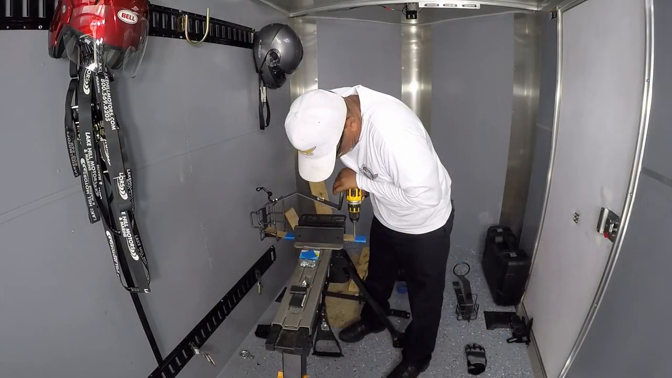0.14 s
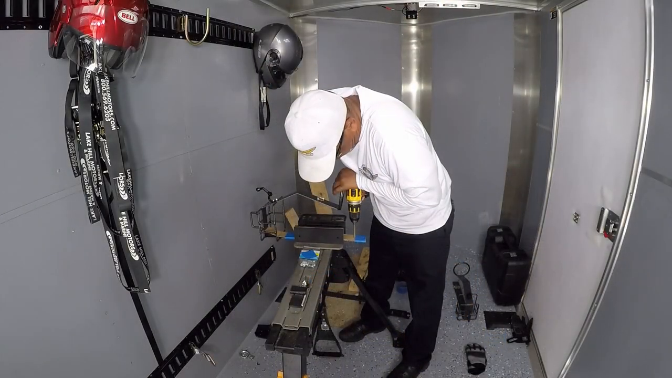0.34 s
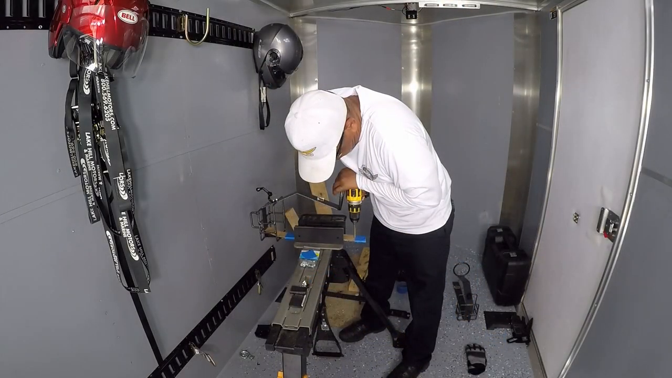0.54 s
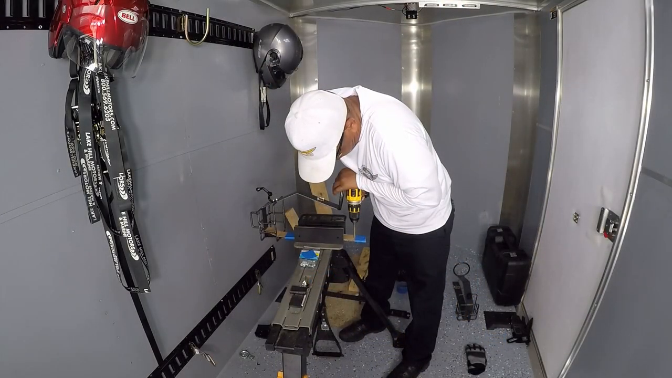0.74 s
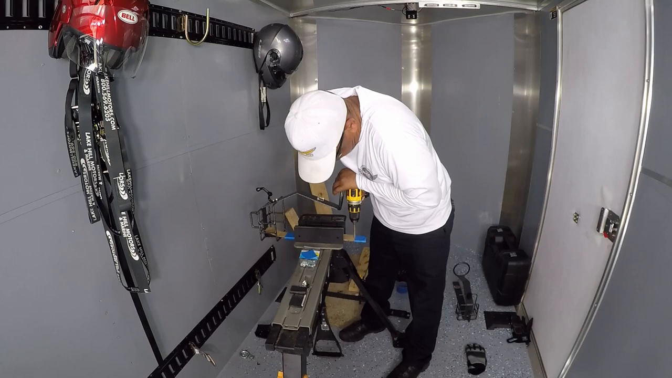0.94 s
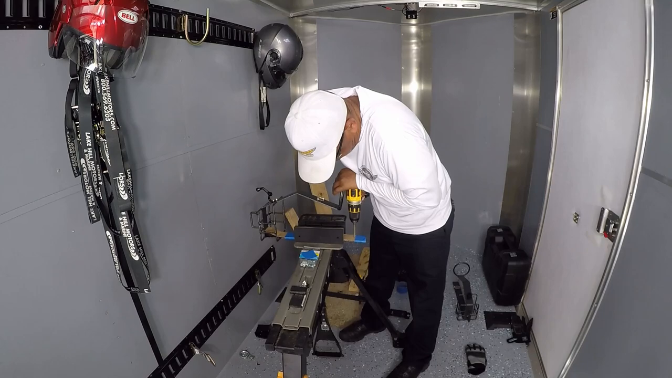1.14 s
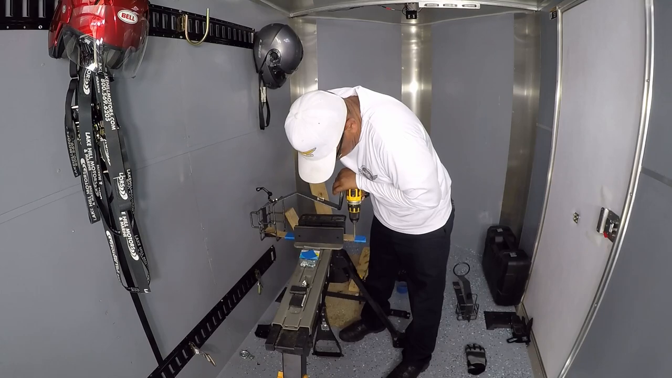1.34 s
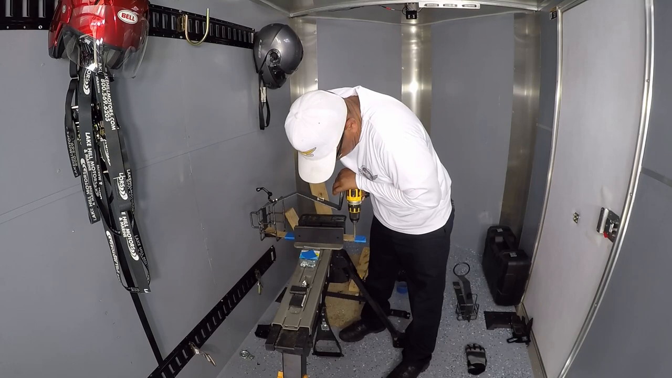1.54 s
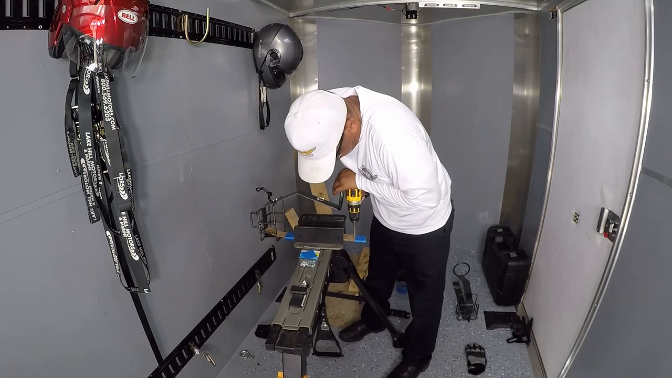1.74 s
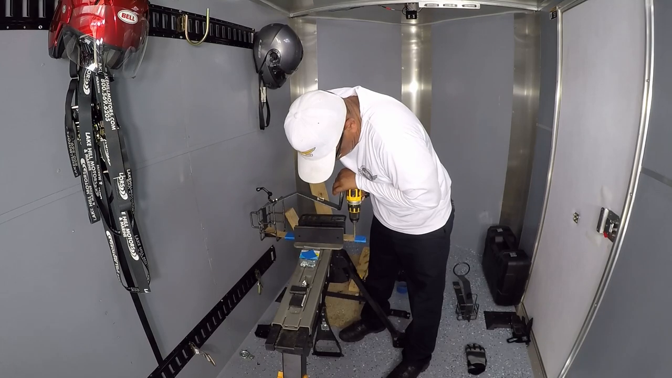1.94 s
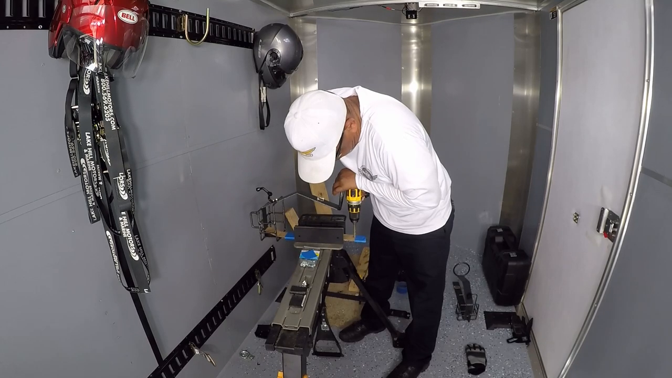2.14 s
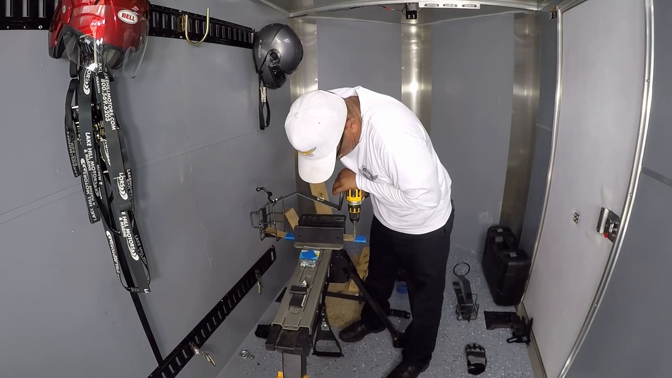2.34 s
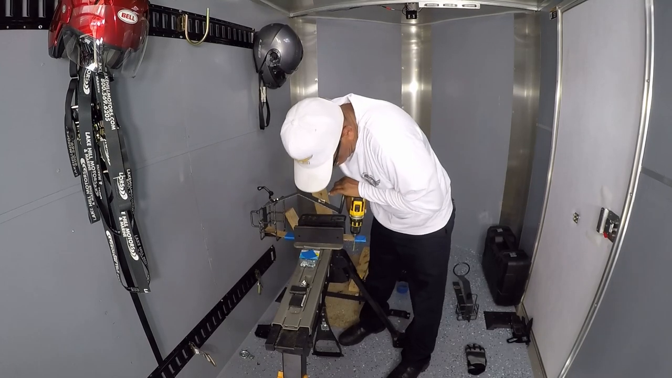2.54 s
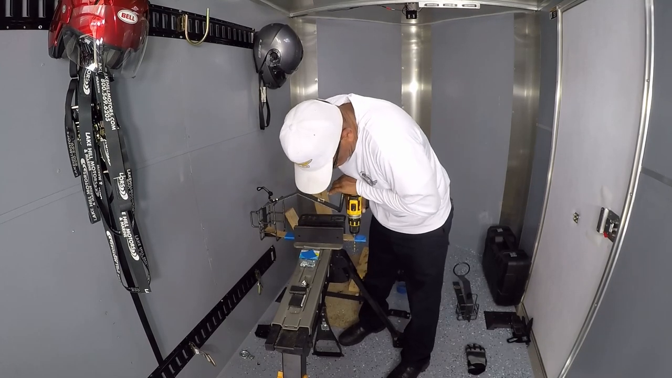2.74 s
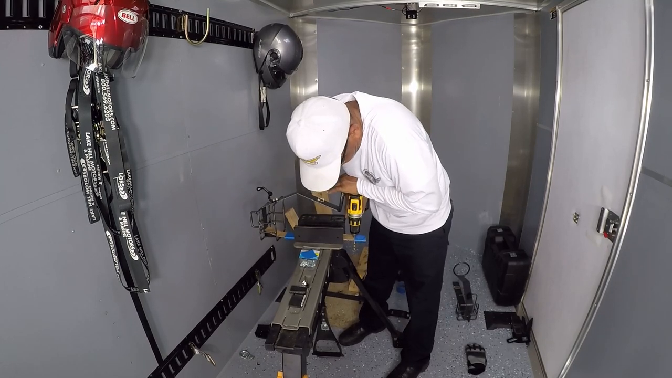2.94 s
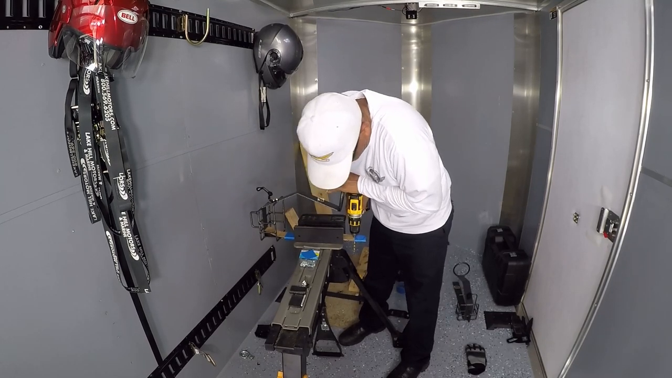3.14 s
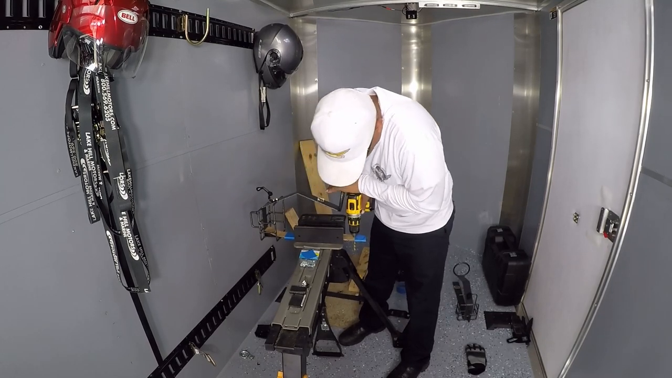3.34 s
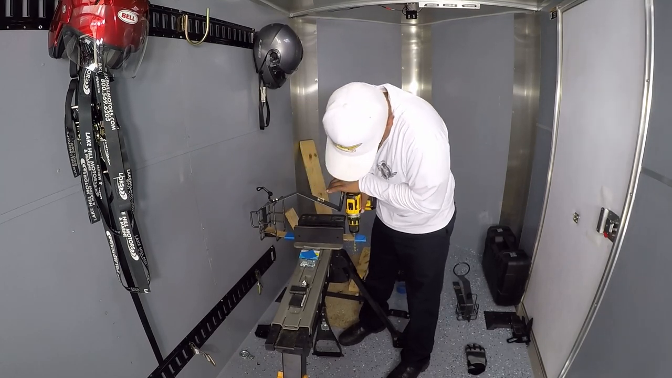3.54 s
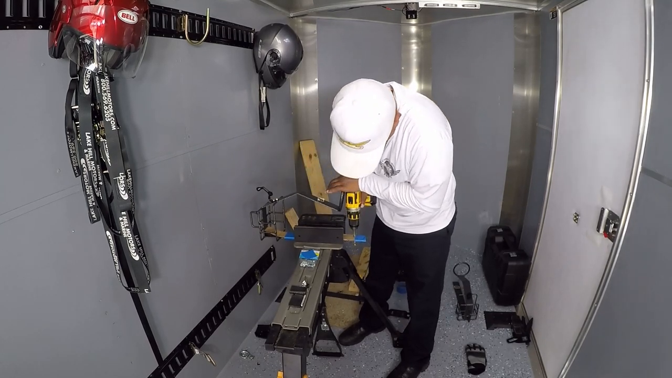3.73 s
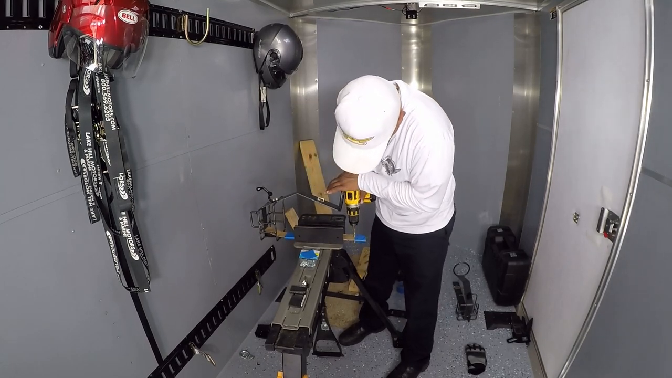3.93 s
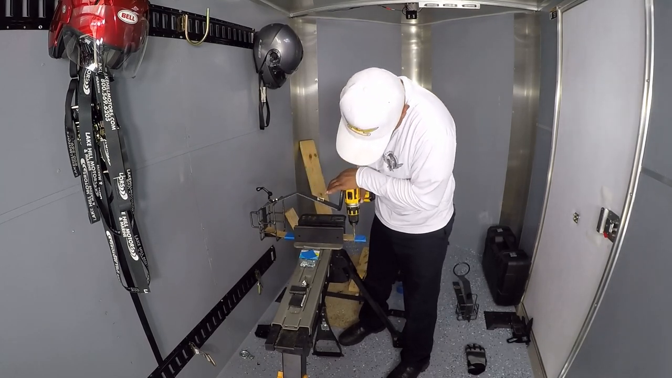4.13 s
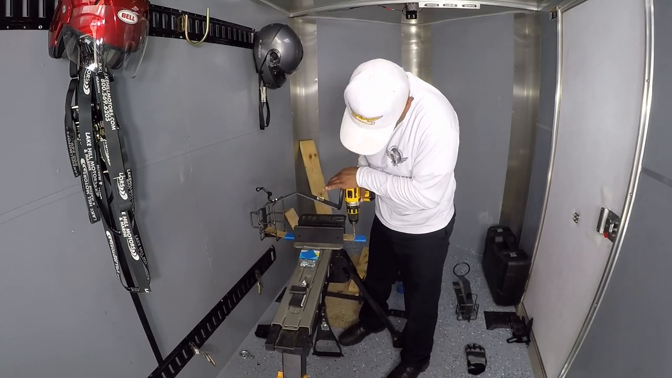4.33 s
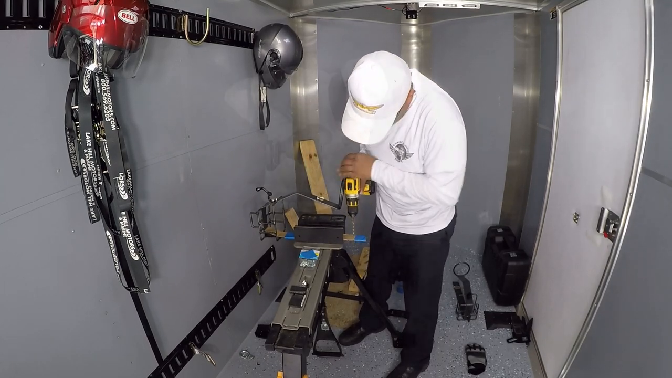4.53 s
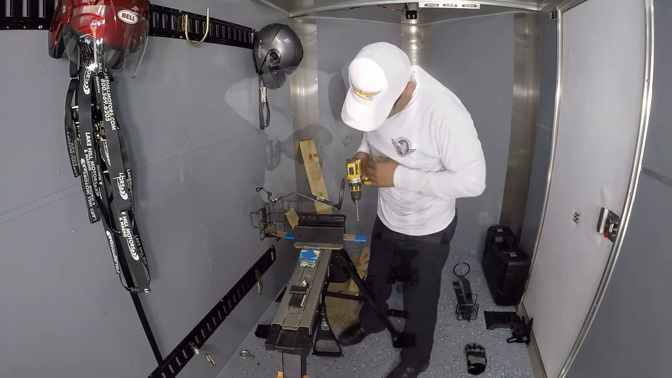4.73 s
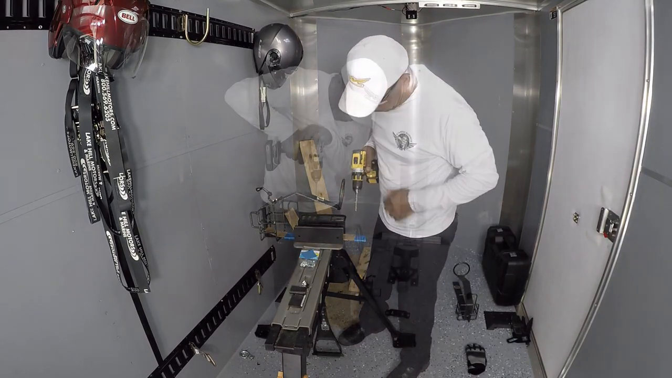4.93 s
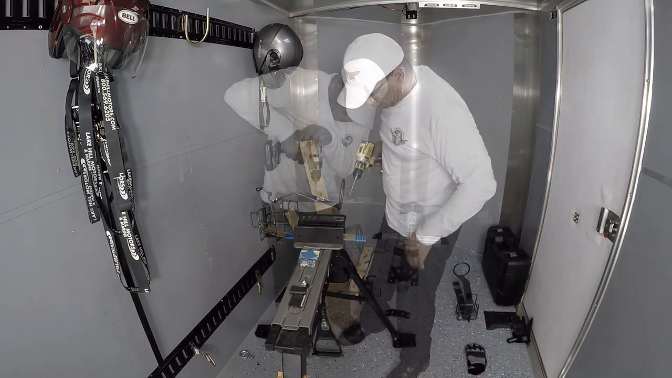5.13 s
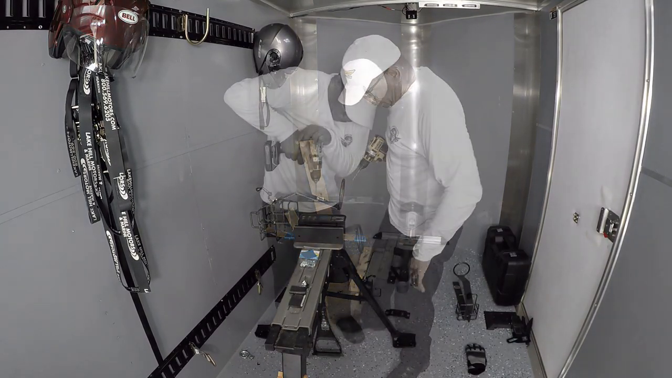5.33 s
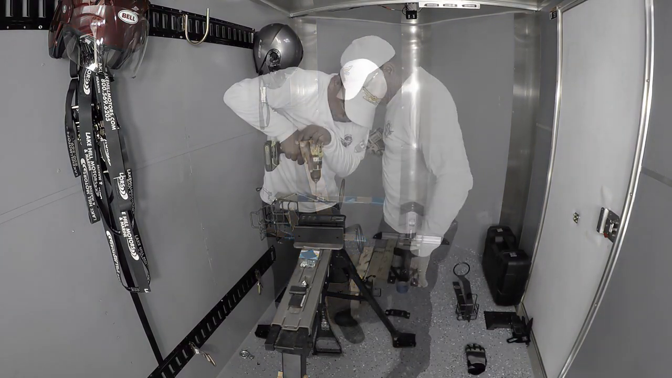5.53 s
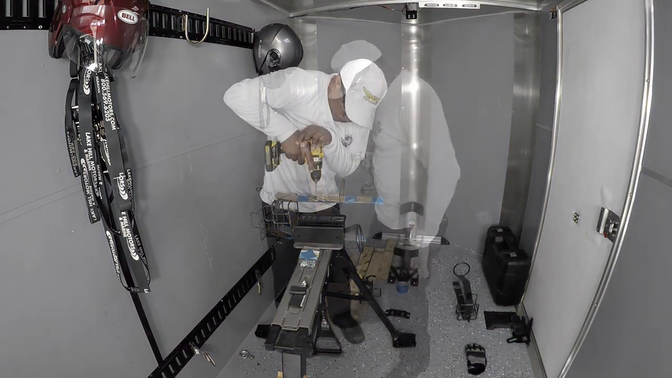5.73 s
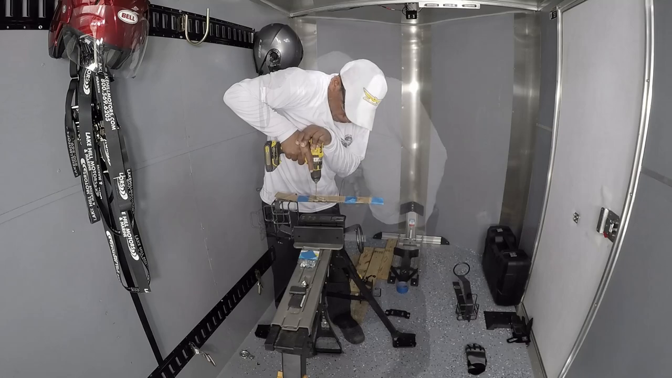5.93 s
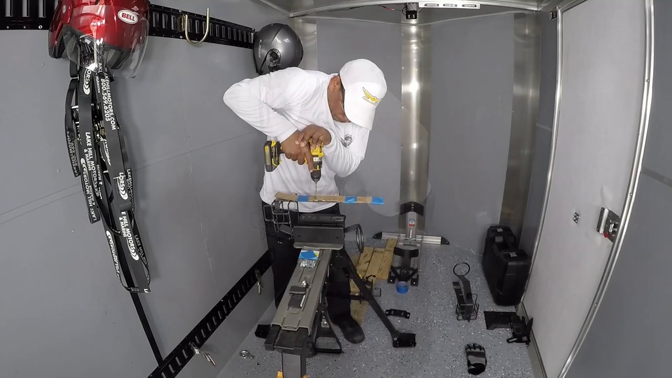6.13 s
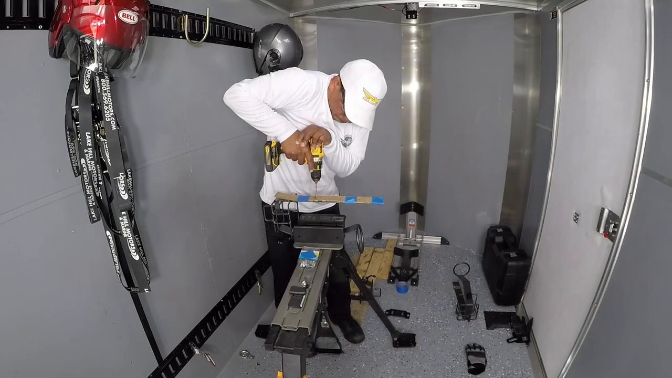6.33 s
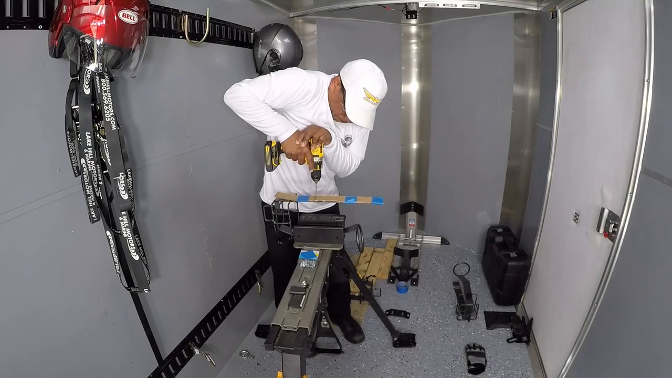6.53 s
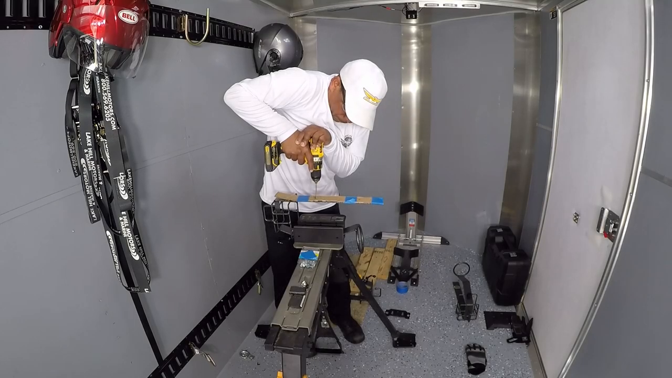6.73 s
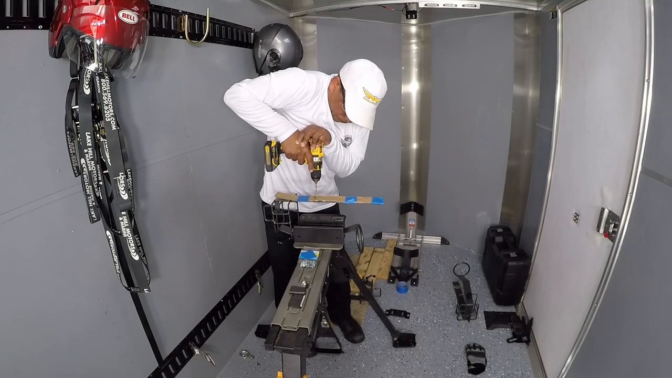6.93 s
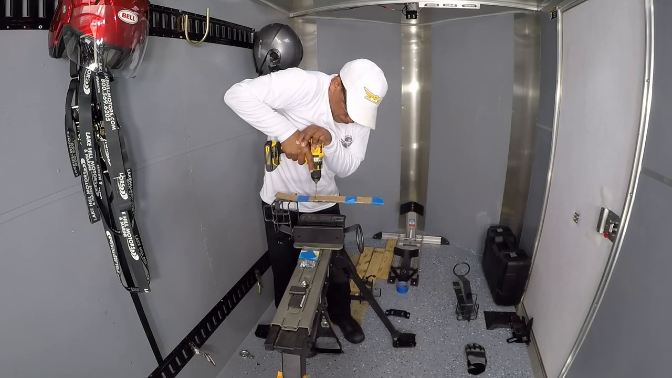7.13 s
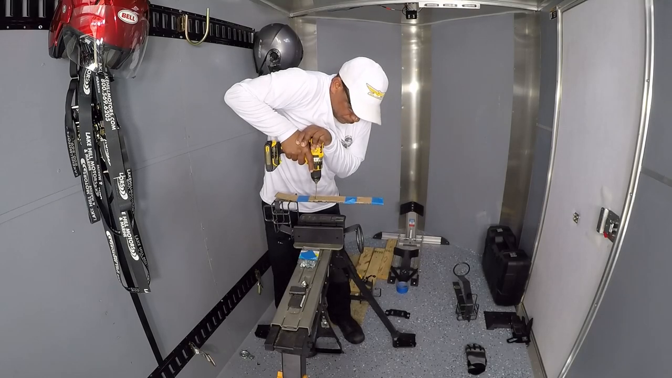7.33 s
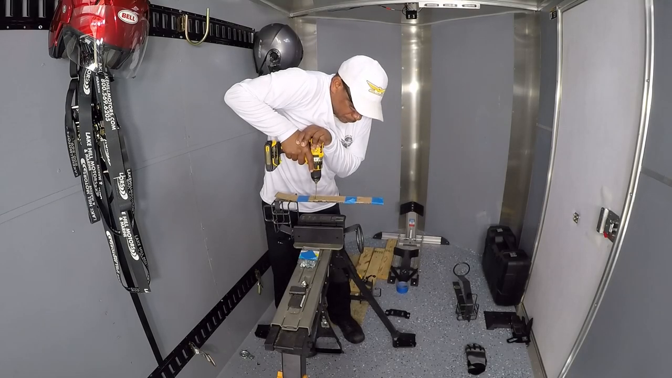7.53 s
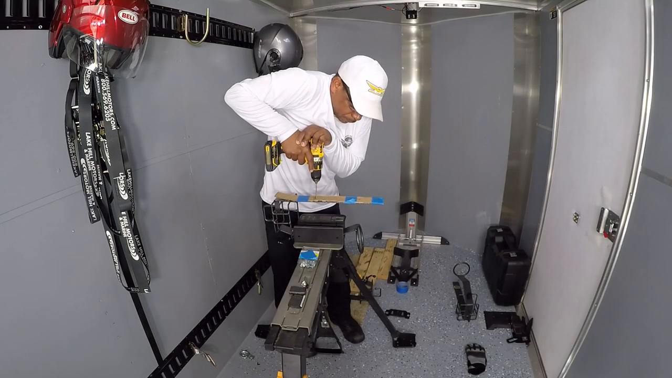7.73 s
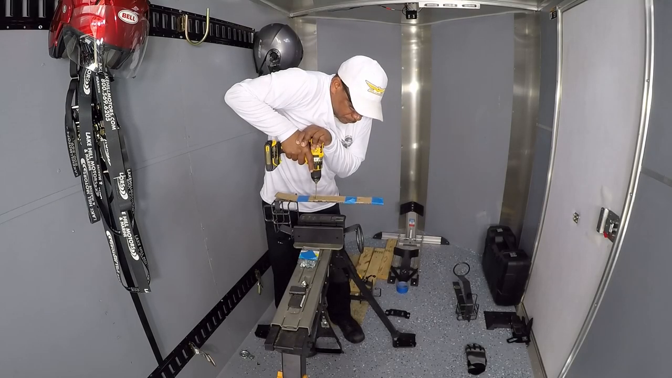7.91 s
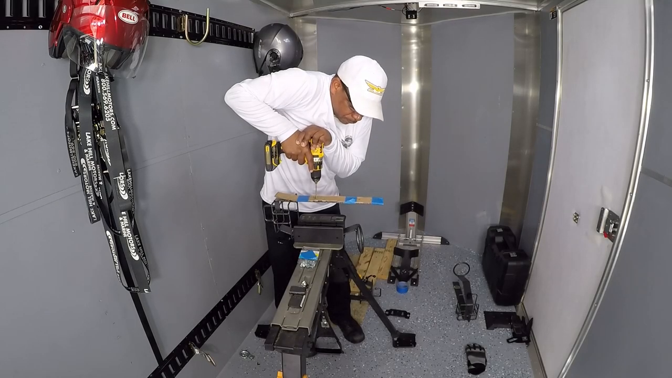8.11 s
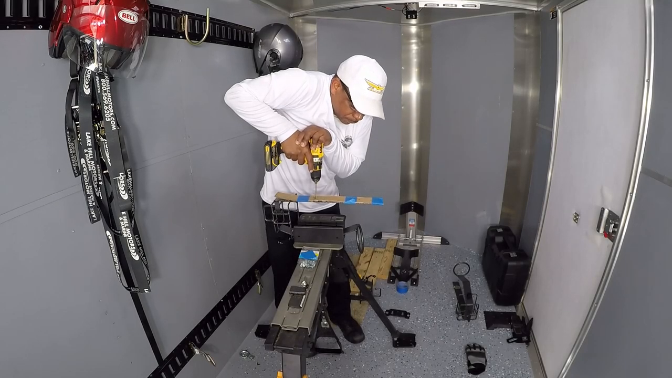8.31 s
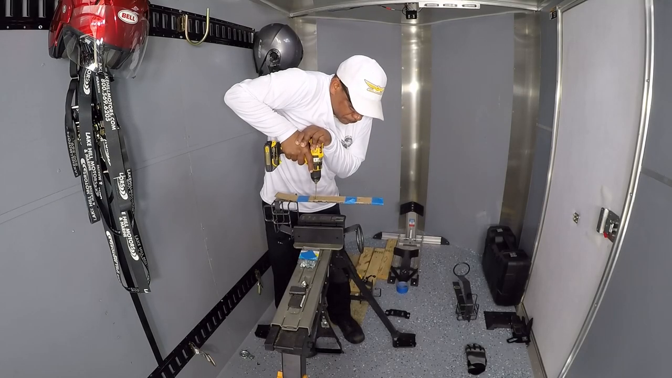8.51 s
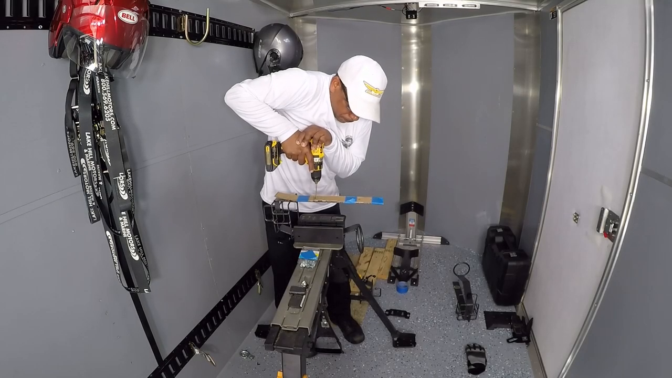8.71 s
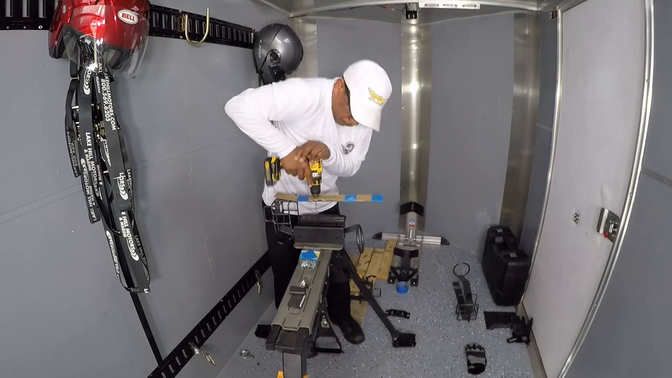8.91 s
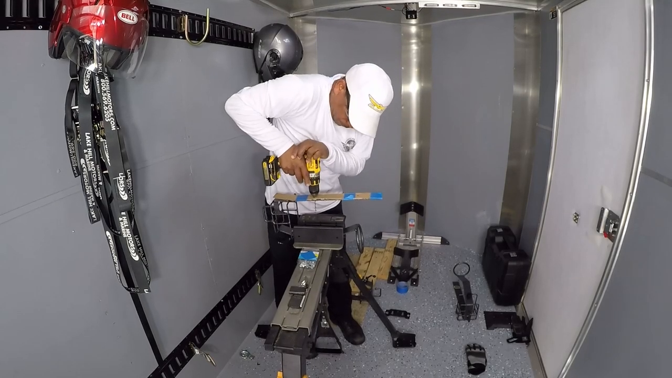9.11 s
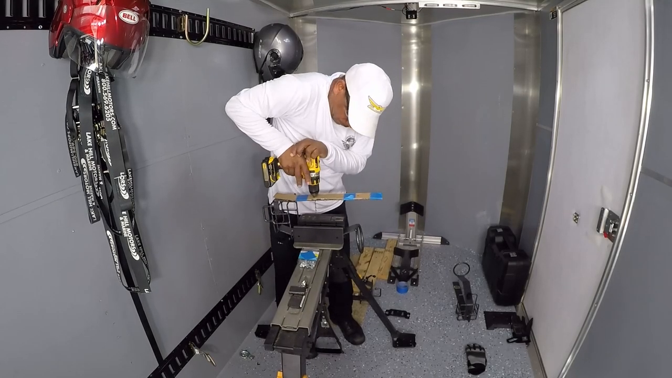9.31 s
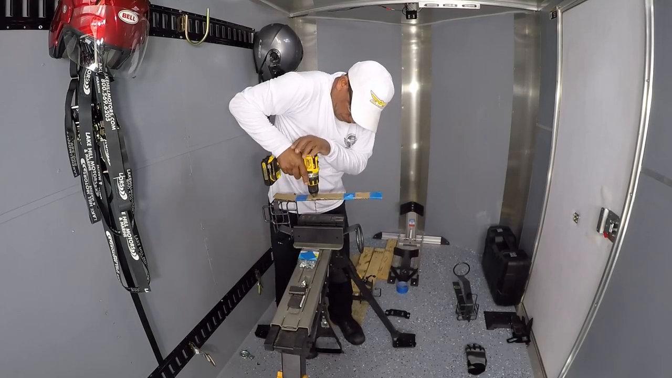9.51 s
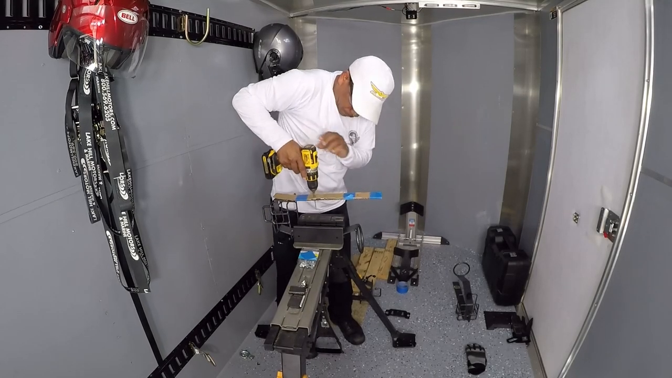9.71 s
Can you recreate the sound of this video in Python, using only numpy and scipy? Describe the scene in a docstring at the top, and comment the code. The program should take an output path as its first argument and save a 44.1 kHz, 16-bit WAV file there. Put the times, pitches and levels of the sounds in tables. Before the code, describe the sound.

One microphone in a bare, boxy trailer picks up a drill biting steel held in a vice: gritty chatter pulsing with each turn while the stand rumbles. The bit catches with a clatter and hard knock. After small clicks and a smooth motor whir, the next cut creeps in, squawking and squealing unevenly until it too snags with a heavy thump. Quiet air, clicks and a short whir finish.

```python
"""Inside an empty-sounding box trailer, one microphone channel: a cordless drill on a steel bracket in a vice.
It opens in the first hole, chattering with every turn, then snags, rattles and knocks as it breaks through.
The drill whirs freely, then bores a second hole with squawks and squeals, snags again and whirs briefly.
Cutting is random chip grains and resonances, the motor noise and tones, the shaking stand low sines and
noise. Each source has its own share of wall reflections, hence its apparent distance; faint air throughout."""
import sys
import numpy as np
from scipy import signal
from scipy.fft import rfft, irfft, next_fast_len
from scipy.io import wavfile
from scipy.ndimage import uniform_filter1d

SR = 44100
rng = np.random.default_rng(int(sys.argv[2]) if len(sys.argv) > 2 else 0)


def generate_wav(signal):
    """Clip the signal to [-1, 1] and save it as 16-bit WAV at the path in sys.argv[1]."""
    frames = np.transpose(np.atleast_2d(signal))
    scaled = np.clip(frames, -1, 1) * 32767
    pcm = np.round(scaled).astype(np.int16)
    wavfile.write(sys.argv[1], SR, pcm)


N = 430416
TIME = np.arange(N) / SR
# In all tables level/dB is relative, before the trims and wavering in the function that plays it.


def from_db(db):
    """Decibels to gain."""
    return 10 ** (np.asarray(db) / 20)


def rms_one(x):
    """Scale to unit power."""
    return x / np.sqrt(np.mean(x ** 2) + 1e-20)


def levels(rows, fade):
    """One gain curve per dB column, fading to silence (fade in s) outside the rows."""
    s, *columns = np.transpose(rows)
    gate = np.clip(1 + np.minimum(TIME - s[0], s[-1] - TIME) / fade, 0, 1)
    return [gate * from_db(np.interp(TIME, s, column)) for column in columns]


def burst(start, length, attack_s, fall_db_per_s):
    """Gain that rises, holds to the end of its length and then dies away."""
    age = TIME - start
    rise = np.clip(age / attack_s, 0, 1)
    return rise * from_db(-fall_db_per_s * np.maximum(age - length, 0))


def at_hz(points, hz):
    """Read a table on a log-frequency axis."""
    f, value = np.transpose(points)
    return np.interp(np.log(np.maximum(hz, 1)), np.log(f), value)


def coloured(x, spectrum):
    """Give x a smooth spectrum that falls away beyond its end points, at unit power."""
    size = next_fast_len(len(x), True)
    hz = np.maximum(np.arange(size // 2 + 1) * SR / size, 1)
    ends = np.minimum(np.minimum(hz / spectrum[0][0], spectrum[-1][0] / hz), 1) ** 2
    shaped = rfft(x, size) * from_db(at_hz(spectrum, hz)) * ends
    return rms_one(irfft(shaped, size)[:len(x)])


def drift(rate):
    """Smooth random wandering with spread 1, computed at every 40th sample; rate in Hz."""
    r = np.exp(-80 * np.pi * rate / SR)
    noise = rng.standard_normal(N // 40 + 2002)
    slow = signal.lfilter([1], [1, -2 * r, r * r], noise)[2000:]   # skip the filter's start
    return np.interp(np.arange(N) / 40, np.arange(len(slow)), rms_one(slow))


def resonate(x, hz, width):
    """Two-pole resonance with gain 1 on top; width in Hz."""
    r = np.exp(-np.pi * width / SR)
    zeros = np.array([1, 0, -1]) * (1 - r * r) / 2
    return signal.lfilter(zeros, [1, -2 * r * np.cos(2 * np.pi * hz / SR), r * r], x)


def steady(x, window=0.029):
    """Even out the level over a window in s, keeping the faster grain."""
    return x / np.sqrt(np.maximum(uniform_filter1d(x * x, int(window * SR)), 1e-12))


def grains(per_s, spread_db):
    """Random tiny fractures of uneven size."""
    sizes = from_db(spread_db * np.minimum(rng.exponential(1, N), 4)) * rng.choice([-1, 1], N)
    return rms_one(sizes * (rng.random(N) < per_s / SR))


# trailer reverberation: f/Hz, time to fall 60 dB t/s
TRAILER_DECAY = [(100, 0.29), (1000, 0.34), (2200, 0.32), (5000, 0.24), (12000, 0.24)]


def trailer_echoes():
    """Dense reflections between close walls, each band dying at its own rate; unit energy."""
    t = np.arange(SR * 3 // 5) / SR
    edges = np.geomspace(60, 16000, 9)
    tail = 0
    for low, high in zip(edges, edges[1:]):
        band_pass = signal.butter(2, [low, high], "band", fs=SR, output="sos")
        band = signal.sosfilt(band_pass, rng.standard_normal(len(t)))
        tail = tail + band * from_db(-60 * t / at_hz(TRAILER_DECAY, np.sqrt(low * high)))
    tail = tail * (t > .003)   # the first wall answers after 3 ms
    return tail / np.sqrt(np.sum(tail ** 2))


def in_trailer(x, echoes, wet_db):
    """Direct sound plus reflections at about the same total power; more wet seems farther off."""
    wet = from_db(wet_db)
    return (x + wet * signal.fftconvolve(x, echoes)[:N]) / np.sqrt(1 + wet * wet)


def bite(turns, once_db, twice_db, uneven_db):
    """Cutting force: the two lips bite in turn, one harder than the other."""
    angle = 2 * np.pi * turns
    return from_db(once_db * np.cos(angle) + twice_db * np.cos(2 * angle) + uneven_db * drift(49.7))


def chatter(force, pitch_hz, modes, limit, echoes, wet_db):
    """Slips pump the bracket's modes around a moving pitch; friction caps the swing."""
    slips, rings = force * grains(6000, 1.07), 0
    for k, (multiple, width, db) in enumerate(modes):
        spin = np.exp(2j * np.pi * np.cumsum(multiple * pitch_hz) / SR)
        r = np.exp(-np.pi * width / SR)
        swelling = signal.lfilter([1 - r], [1, -r], slips / spin)   # the mode, shifted to 0 Hz
        rings = rings + from_db(db) * (-1) ** k * spin * swelling
    swing = np.abs(rings) / np.std(rings)
    capped = rings.real / np.sqrt(1 + (swing / limit) ** 2)
    rasp = resonate(capped, np.mean(pitch_hz), 900)
    return steady(in_trailer(rasp, echoes, wet_db), window=0.082)


def scrape(force, spectrum, peaks, echoes):
    """Chips tear off the steel; narrow peaks from the steel and the trailer's reflections colour the sound."""
    chips = coloured(force * grains(7000, 2.5), spectrum)
    colour = sum((from_db(db) - 1) * resonate(chips, hz, width) for hz, width, db in peaks)
    return steady(in_trailer(chips + colour, echoes, wet_db=-1.5), window=0.19)


def friction(rows, soft):
    """Gain of a rubbed mode: bursts (t/s, length/s, level/dB) that stand out from a soft level."""
    bursts = sum(from_db(db) * burst(s, length, attack_s=0.019, fall_db_per_s=173)
                 for s, length, db in rows)
    return np.hypot(soft, bursts)


def squeal_tone(force, hz, waver_hz, overtone_db, echoes):
    """Friction keeps one mode of the bit singing; its pitch bends with the load and wavers."""
    bend = np.log(force) - np.mean(np.log(force))
    phase = 2 * np.pi * np.cumsum(hz + waver_hz * (drift(60) + 1.46 * bend)) / SR
    tone = force * (np.sin(phase) + from_db(overtone_db) * np.sin(2 * phase))
    return steady(in_trailer(tone, echoes, wet_db=3.5), window=0.08)


# steady air in the trailer: f/Hz, level/dB per Hz
AIR_SPECTRUM = [(25, -3.5), (60, -10), (105, -18), (170, -33), (360, -26.5), (460, -32.5), (950, -27),
                (1600, -32), (2100, -28.5), (3200, -41), (5500, -58), (15000, -73)]


def air():
    """Noise floor of the place: faint and mostly low."""
    return from_db(-36.0) * coloured(rng.standard_normal(N), AIR_SPECTRUM)


# first hole, chatter giving way to scraping: t/s, stick-slip chatter level/dB, scraping level/dB
FIRST_CUT_LEVELS = [(0, -18, -32), (.34, -17.5, -27), (.45, -15.5, -31), (.75, -18, -30.5),
                    (1.15, -16.5, -28), (1.5, -17.5, -30), (1.92, -24, -25.5), (2.22, -17, -26.5),
                    (2.44, -30, -27)]
# chatter pitch wandering, higher by the end, before the bends of each turn: t/s, f/Hz
FIRST_CHATTER_PITCH = [(0, 2167), (.3, 2068), (.55, 2144), (.8, 2073), (1.05, 2088), (1.45, 2197),
                       (1.8, 2150), (2.4, 2190)]
# stick-slip modes: multiple of the chatter pitch, width/Hz, level/dB
FIRST_CHATTER_MODES = [(0.972, 138, 2.5), (1.024, 114, 0.5)]
# scraping spectrum: f/Hz, level/dB per Hz
FIRST_SCRAPE_SPECTRUM = [(150, -15), (400, -22.5), (900, -14.5), (1350, -12), (1650, -17), (2400, -0.5),
                         (3200, -4), (3700, -11.5), (4200, -10), (4600, -14.5), (5300, -17.5), (6200, -23),
                         (10000, -41.5), (11500, -54.5), (15000, -66)]
# narrow peaks in the scraping, from the steel and the trailer's reflections: f/Hz, width/Hz, lift/dB
FIRST_SCRAPE_PEAKS = [(1377, 230, 9.5), (3140, 13, 9), (3990, 33, 11), (5300, 130, 5)]
# the bit rings high: t/s, length/s, level/dB
HIGH_RINGS = [(.4, 0.057, -29.5), (1.15, 0.061, -29.5), (1.84, 0.091, -28), (2.07, 0.23, -29.5)]


def first_hole(turns, echoes):
    """Hard pressure: a rasping chatter that throbs and bends in pitch with every turn, and a high ring."""
    chatter_gain, scrape_gain = levels(FIRST_CUT_LEVELS, fade=0.031)
    ring_gain = friction(HIGH_RINGS, from_db(-18) * chatter_gain)   # sings softly between bursts
    pitch_hz = np.interp(TIME, *np.transpose(FIRST_CHATTER_PITCH))
    pitch_hz = pitch_hz + 45 * np.sin(2 * np.pi * turns) + 45 * drift(23)
    force = bite(turns, once_db=3.5, twice_db=2.5, uneven_db=2.0)
    rasp = chatter(force, pitch_hz, FIRST_CHATTER_MODES, limit=2.9, echoes=echoes, wet_db=-11.0)
    scrape_force = bite(turns, once_db=2.5, twice_db=-1.0, uneven_db=0.74)
    chips = scrape(scrape_force, FIRST_SCRAPE_SPECTRUM, FIRST_SCRAPE_PEAKS, echoes)
    ring = squeal_tone(force ** .5, hz=4180, waver_hz=34.2, overtone_db=-36, echoes=echoes)
    cutting = from_db(0.2) * chatter_gain * rasp + from_db(5.5) * scrape_gain * chips
    return cutting + ring_gain * ring


# the drill bears on the steel: t/s, length/s, gear whine level/dB, sway of the stand level/dB
LOADED_SPELLS = [(-.15, 2.83, -40, -20.5), (5.6, 3.25, -50, -28.5)]


def under_load():
    """Gains of gear whine and sway while the drill bears on the steel."""
    return sum(np.outer(from_db(dbs), burst(s, length, attack_s=0.2, fall_db_per_s=172))
               for s, length, *dbs in LOADED_SPELLS)


# the stand lurches on the floor: t/s, length/s, thump level/dB, rocking level/dB
STAND_LURCHES = [(2.454, 0.11, -22, -23.5), (3.55, 0.099, -36, -41), (3.698, 0.037, -40.5, -26.5),
                 (4.75, .06, -39, -28.5), (8.875, 0.084, -17.5, -15.5), (9.403, 0.27, -45, -41)]
# the stand's hum, one list for each hole: t/s, level/dB
STAND_HUMS = [
    [(0, -31), (1.8, -31), (2.7, -33.5)],
    [(4.8, -43.5), (5.35, -29.5), (5.9, -28.5), (6.7, -25.5), (7.9, -24), (8.05, -28.5), (8.9, -33)],
]
# lurch thump spectrum: f/Hz, level/dB per Hz
THUMP_SPECTRUM = [(20, -15), (32, 7.5), (50, -1), (80, -6.5), (125, -5), (170, -20.5), (260, -20.5),
                  (500, -43)]


def floor_shake(turns):
    """The wobbling drill rocks the stand: sway at the turn rate, hum at 3 or 4 times it, thumping lurches."""
    attack_s = 0.027
    rocking = sum(from_db(db) * burst(s, length, attack_s, fall_db_per_s=50)
                  for s, length, _, db in STAND_LURCHES)
    thumping = sum(from_db(db) * burst(s, length, attack_s, fall_db_per_s=94)
                   for s, length, db, _ in STAND_LURCHES)
    sway_gain = under_load()[1] + rocking
    hum_gain = sum(levels(rows, fade=.1)[0] for rows in STAND_HUMS)
    angle = 2 * np.pi * turns
    second = np.clip(TIME - 4, 0, 1)   # crossfade from first-hole to second-hole motion
    twice_gain = from_db(-21.0 + 19.0 * second + 1.3 * drift(4))
    sway = np.sqrt(2) * np.cos(angle + 0.082 * drift(3)) + twice_gain * np.sin(2 * angle + drift(3.6))
    first_hum = (1 - second) * np.sin(3 * angle + .5 * drift(1.3))
    second_hum = second * np.sin(4 * angle + 0.18 * drift(4.2))
    hum = np.sqrt(2) * (first_hum + second_hum) * from_db(2 * drift(6.6))
    rumble_spectrum = [(45, -11), (70, 2.5), (100, 9.5), (130, -6.0), (180, -52.5), (400, -53.5)]
    rumble = coloured(rng.standard_normal(N), rumble_spectrum)
    lurch = thumping * steady(coloured(rng.standard_normal(N), THUMP_SPECTRUM), window=0.064)
    humming = hum_gain * (from_db(-3.0) * hum + from_db(-7.0) * rumble)
    return from_db(0.9) * sway_gain * sway + humming + from_db(5.5) * lurch


# the drill whirs outside the cuts: trigger pulled t/s, held for t/s, whir level/dB, spin-up time t/s
FREE_SPELLS = [(3.26, 1.12, -35.5, .11), (9.595, .3, -36.5, .05)]
FREE_ROTOR_HZ = 333.6


def free_running():
    """Rotor speed and whir level outside the cuts: jerk into motion, spin up, hold, coast, brake."""
    start_speed_share, coast_hz_per_s, coast_s = .45, 350, .19   # coasts until the brake grips
    rub_db, rub_s = 13.5, .27   # louder at first, while the bit rubs in the hole as it is drawn out
    rotor_hz, gain = np.zeros(N), np.zeros(N)
    for s, held, db, spin_up_s in FREE_SPELLS:
        age = np.maximum(TIME - s, 0)
        coasting = np.clip(age - held, 0, coast_s)
        hz = FREE_ROTOR_HZ * (1 - (1 - start_speed_share) * np.exp(-age / spin_up_s))
        hz = hz - coast_hz_per_s * coasting
        level_db = db + rub_db * np.exp(-age / rub_s) - 8 * coasting
        rotor_hz = np.where(TIME >= s, hz, rotor_hz)
        sounding = burst(s, held + coast_s, attack_s=0.017, fall_db_per_s=300)
        gain = gain + from_db(level_db) * (hz / FREE_ROTOR_HZ) ** 2.95 * sounding
    return rotor_hz, gain


# motor and gear tones: multiple of rotor speed, level/dB against the whir at top speed
ROTOR_TONES = [(2, -15), (6, -12), (8, -14), (11, -15), (15, -21)]
# fan whir spectrum: f/Hz, level/dB per Hz
WHIR_SPECTRUM = [(200, -1), (420, -14), (700, -7), (1150, -5), (1750, -9.5), (2050, 0.5), (2600, 0.5),
                 (4200, -8), (5200, -13.5), (6000, -20), (9500, -29.5), (11500, -46), (15000, -54)]


def motor(turns, echoes):
    """Under load a gear whine that sags with the speed; running free, fan whir, tones and mesh hiss."""
    gear_ratio = 12.28
    rotor_hz, gain = free_running()
    whine_gain, _ = under_load()
    rotor = 2 * np.pi * np.cumsum(rotor_hz * (1 + 0.00098 * drift(10.0))) / SR
    tones = sum(from_db(db + 3.5 * drift(19)) * np.sin(k * rotor) for k, db in ROTOR_TONES)
    tones = (rotor_hz / rotor_hz.max()) ** 8 * tones
    below_speed = np.clip((rotor_hz.max() - rotor_hz) / 25, 0, 1)   # mesh hiss fades at top speed
    mesh = drift(150) * np.sin(14 * rotor) + drift(150) * np.cos(14 * rotor)
    mesh = from_db(-8.5) * below_speed * mesh
    fan = coloured(rng.standard_normal(N) * (1 + 0.43 * np.sin(rotor / 2)), WHIR_SPECTRUM)
    whine = np.sin(2 * np.pi * 2 * gear_ratio * turns) * from_db(1.8 * drift(12))
    whir = in_trailer(fan + mesh, echoes, wet_db=1.0) + tones
    return from_db(-1.0) * gain * whir + whine_gain * whine


# sharper onsets in the chatter: t/s, level/dB
SHARP_ONSETS = [(.597, -8), (1.022, -10), (1.199, -10), (1.52, -10), (2.002, -7), (5.694, -9), (6.248, -11),
                (6.367, -8), (6.922, -9), (7.24, -11)]


def strong_slips(echoes):
    """A sudden stronger slip rings at the chatter's pitch."""
    hz, width_hz = 2120, 230
    clicks = np.zeros(N)
    for s, db in SHARP_ONSETS:
        clicks[int(s * SR)] = from_db(db) * SR / (2 * np.pi * width_hz)   # offsets the resonance's loss
    ringing = resonate(resonate(clicks + 1e-18, hz, width_hz), hz, 900)
    return from_db(4.5) * in_trailer(ringing, echoes, wet_db=-6.0)


# the bit snags on the burr: t/s, length/s, rattle level/dB, sag dB/s, ring f/Hz, ring width/Hz, lift/dB
BURR_SNAGS = [(2.428, .24, -18, 35, 2900, 200, 7), (8.881, 0.17, -17, 24.5, 2340, 90, 7.5)]
# rattle spectrum: f/Hz, level/dB per Hz
RATTLE_SPECTRUM = [(150, -21), (350, -3), (550, -8), (1150, -3.5), (1700, -6.5), (2150, -1.5), (3000, -9),
                   (4200, -11), (5400, -17), (7000, -26.5), (10000, -36.5), (11500, -49), (15000, -58)]


def breakthrough(turns, echoes):
    """The lips catch on the burr and rattle the bracket, which rings at another pitch at each hole."""
    force = bite(turns, once_db=3.0, twice_db=5.5, uneven_db=3.5)
    catches = coloured(force * grains(2000, 4.0), RATTLE_SPECTRUM)
    out = 0
    for s, length, db, sag_db_per_s, hz, width, lift_db in BURR_SNAGS:
        sagging = from_db(db - sag_db_per_s * np.clip(TIME - s, 0, length))
        gain = sagging * burst(s, length, attack_s=0.046, fall_db_per_s=140)
        rattle = catches + (from_db(lift_db) - 1) * resonate(catches, hz, width)
        out = out + gain * steady(in_trailer(rattle, echoes, wet_db=15.5))   # mostly reflections
    return from_db(-.5) * out


# knocks of the bit, clicks of trigger and chuck: t/s, level/dB, low-mid share/dB, body f/Hz
CONTACTS = [(2.682, -12, -4.5, 1920), (2.688, -21.5, -5, 2900), (2.975, -38, -7, 2900),
            (2.994, -33, -1.5, 2000), (3.218, -35, -4, 3100), (3.261, -33, 2.5, 810),
            (4.583, -29, -3, 1320), (8.933, -17.5, 0.5, 1130), (9.347, -35.5, -12, 2300),
            (9.395, -30, -3, 1970), (9.543, -33.5, -5, 2320)]
# contact spectrum: f/Hz, level/dB per Hz
KNOCK_SPECTRUM = [(150, -6), (500, -0.5), (950, 6), (1500, 0.5), (2000, 0.5), (3200, -2), (5400, -13.5),
                  (7000, -22.5), (10000, -36), (12000, -47), (15000, -48)]


def knocks(echoes):
    """Short hard contacts, each ringing the part it hits and carrying its own share of low end."""
    out, t = np.zeros(N + SR), np.arange(SR // 5) / SR
    low_pass = signal.butter(1, 1500, fs=SR)
    envelope = np.exp(-t / 0.0073) * np.minimum(t / 0.00068, 1)   # decay and attack in s
    for s, db, low_db, body_hz in CONTACTS:
        contact = coloured(rng.standard_normal(len(t)), KNOCK_SPECTRUM) * envelope
        contact = contact + (from_db(low_db) - 1) * signal.lfilter(*low_pass, contact)
        contact = contact + (from_db(9.5) - 1) * resonate(contact, body_hz, width=160)
        start = int(s * SR)
        out[start:start + len(t)] += from_db(db) * contact
    return from_db(4.5) * in_trailer(out[:N], echoes, wet_db=2.0)


# second hole: t/s, low chatter level/dB, scraping level/dB
SECOND_CUT_LEVELS = [(4.66, -54, -57.5), (4.84, -46, -46), (5.16, -28.5, -38.5), (5.35, -33.5, -35),
                     (5.8, -24.5, -28.5), (6.55, -20, -27), (6.9, -25.5, -27.5), (7.8, -24.5, -26.5),
                     (8.9, -35, -28.5)]
# stick-slip modes of chatter and squawk: multiple of the chatter pitch, width/Hz, level/dB
SECOND_CHATTER_MODES = [(0.912, 89, -6.5), (0.989, 120, -9)]
SQUAWK_MODES = [(1, 28, 0)]
# the chatter tightens to a squawk: t/s, length/s, level/dB
SQUAWK_BURSTS = [(5.06, .14, -31.5), (5.66, 0.085, -26), (6.4, 0.098, -27), (6.78, 0.19, -22.5),
                 (7.18, 0.067, -24), (7.5, 0.25, -18.5), (8.0, 0.27, -23)]
# scraping spectrum: f/Hz, level/dB per Hz
SECOND_SCRAPE_SPECTRUM = [(150, -16), (400, -21), (850, -15.5), (1200, -6.5), (1600, -13.5), (2300, -6),
                          (2800, -8.5), (3400, -7.5), (4400, -13.5), (5200, -12), (6000, -26),
                          (10000, -40.5), (11500, -53.5), (15000, -59)]
# narrow peaks in the scraping, from the steel and the trailer's reflections: f/Hz, width/Hz, lift/dB
SECOND_SCRAPE_PEAKS = [(692, 5.5, 13.7), (1073, 16, 8.2), (2524, 29, 13.3), (3234.6, 20, 15.6),
                       (3840, 9.4, 10.3), (4013, 24, 14.2), (4600, 15, 5.2), (7190, 36, 14.3),
                       (10330, 90, 8), (12830, 50, 10)]


def second_hole(turns, echoes):
    """Both lips cut more evenly: a looser, lower chatter that now and then tightens to a squawk."""
    chatter_gain, scrape_gain = levels(SECOND_CUT_LEVELS, fade=0.027)
    squawk_gain = friction(SQUAWK_BURSTS, from_db(-2.5) * scrape_gain)   # soft between bursts
    force = bite(turns, once_db=2.5, twice_db=5.0, uneven_db=2.5)
    rasp = chatter(force, 2000 + 22 * drift(7.1), SECOND_CHATTER_MODES, limit=4.4, echoes=echoes, wet_db=3.0)
    squawk = chatter(force, 2138 + 18 * drift(13), SQUAWK_MODES, limit=5.1, echoes=echoes, wet_db=-3.0)
    chips = scrape(force ** 0.57, SECOND_SCRAPE_SPECTRUM, SECOND_SCRAPE_PEAKS, echoes)
    # the bit sings about an octave above the chatter
    octave = squeal_tone(force, hz=3998, waver_hz=24.2, overtone_db=-33, echoes=echoes)
    chattering = chatter_gain * (from_db(-0.2) * rasp + from_db(-16.5) * octave)
    return chattering + squawk_gain * squawk + from_db(5.0) * scrape_gain * chips


# the bit breaks into a squeal: t/s, length/s, lower tone level/dB, upper tone level/dB
SQUEAL_BURSTS = [(4.862, 0.058, -35, -63), (5.297, 0.088, -30, -61), (5.67, 0.048, -21, -35),
                 (5.806, 0.062, -18.5, -29.5), (6.138, 0.067, -15.5, -34), (6.242, 0.22, -20.5, -33),
                 (6.517, 0.084, -17, -23.5), (6.668, 0.14, -21.5, -28.5), (7.095, 0.22, -18.5, -39),
                 (7.341, 0.094, -20, -26), (7.943, .07, -22, -29), (8.104, 0.077, -24, -29.5),
                 (8.239, 0.23, -19, -27.5), (8.527, 0.084, -19.5, -26.5), (8.618, 0.14, -19.5, -31)]


def squeal(turns, echoes):
    """Two squealing modes about an octave apart flare up together and flutter."""
    _, scrape_gain = levels(SECOND_CUT_LEVELS, fade=0.035)
    lower_rows = [(s, length, db) for s, length, db, _ in SQUEAL_BURSTS]
    upper_rows = [(s, length, db) for s, length, _, db in SQUEAL_BURSTS]
    # between bursts both modes sing softly along with the scraping
    lower_gain = friction(lower_rows, from_db(-1.5) * scrape_gain)
    upper_gain = friction(upper_rows, from_db(-8) * scrape_gain)
    force = bite(turns, once_db=1.0, twice_db=1.5, uneven_db=5.0)
    lower = squeal_tone(force, hz=2531, waver_hz=16.6, overtone_db=-19, echoes=echoes)
    upper = squeal_tone(force, hz=4996, waver_hz=19, overtone_db=-35, echoes=echoes)
    flutter = from_db(1.0 * drift(9.8))
    return flutter * (from_db(-1.5) * lower_gain * lower + from_db(3.5) * upper_gain * upper)


# chuck speed, sagging as the holes deepen: t/s, turns per second f/Hz
CHUCK_SPEED = [(0, 28.4), (1, 28.3), (1.7, 28.1), (2.3, 27.1), (2.65, 26.0), (5.3, 25.5), (7.8, 25.1),
               (8.7, 24.6)]


def scene():
    """Cutting, whine and sway follow the turning chuck; the sources share the trailer's reflections."""
    turns = np.cumsum(np.interp(TIME, *np.transpose(CHUCK_SPEED))) / SR
    echoes = trailer_echoes()
    holes = first_hole(turns, echoes) + second_hole(turns, echoes)
    cutting = holes + strong_slips(echoes) + squeal(turns, echoes)
    contacts = breakthrough(turns, echoes) + knocks(echoes)
    mix = air() + cutting + floor_shake(turns) + motor(turns, echoes) + contacts
    return mix[None]   # one channel


def record(dry):
    """The microphone channel rounds the highest peaks and cuts the top."""
    rounded = dry / (1 + (dry / .97) ** 4) ** .25
    low_pass = signal.cheby2(14, 70, 16000, fs=SR, output="sos")   # 70 dB down from 16 kHz up
    return signal.sosfilt(low_pass, rounded)


dry = scene()
out = record(dry)
generate_wav(out)
```